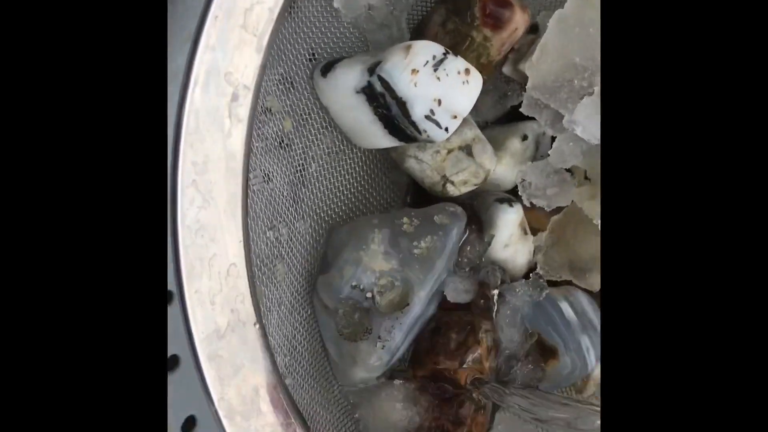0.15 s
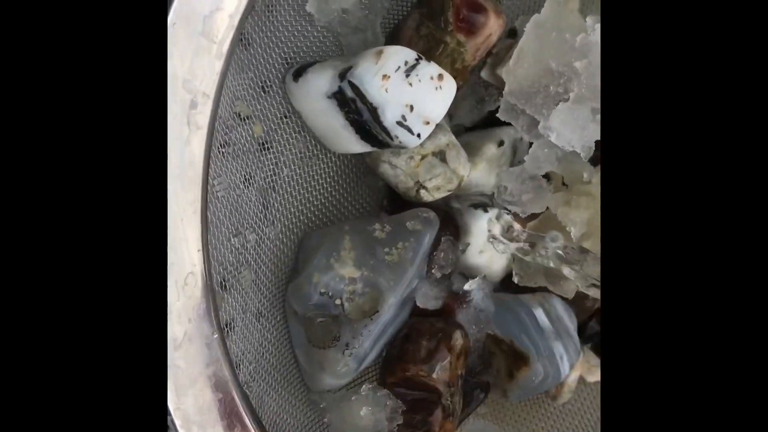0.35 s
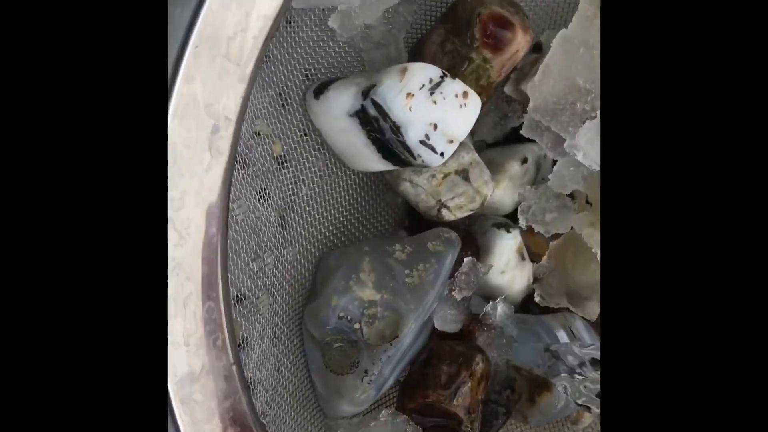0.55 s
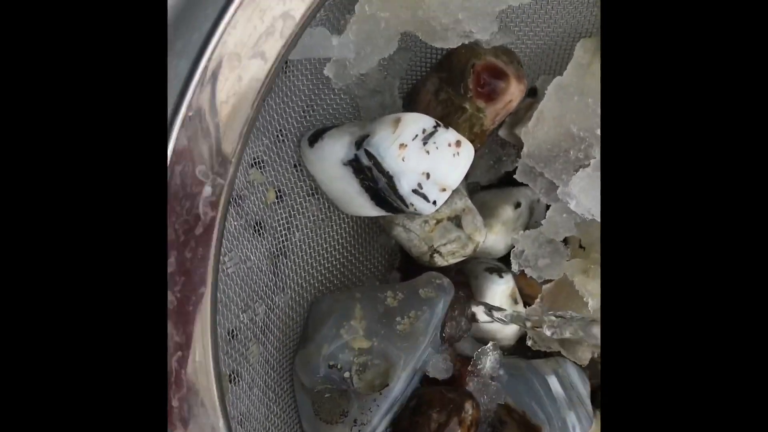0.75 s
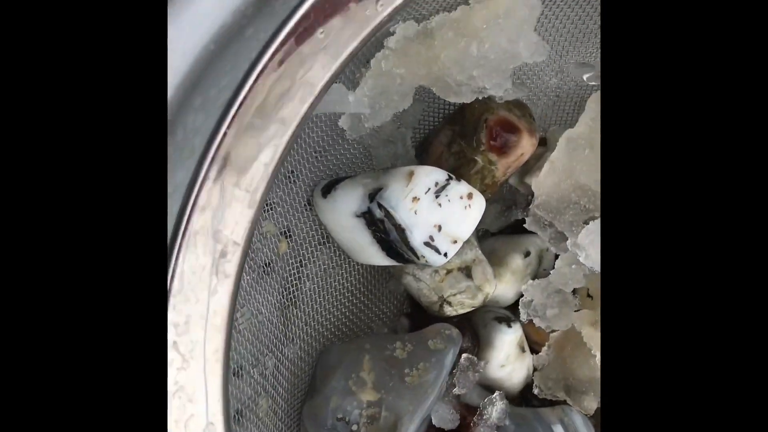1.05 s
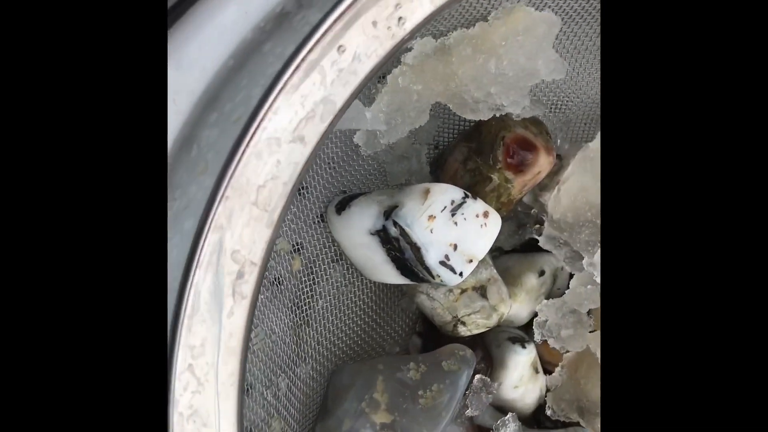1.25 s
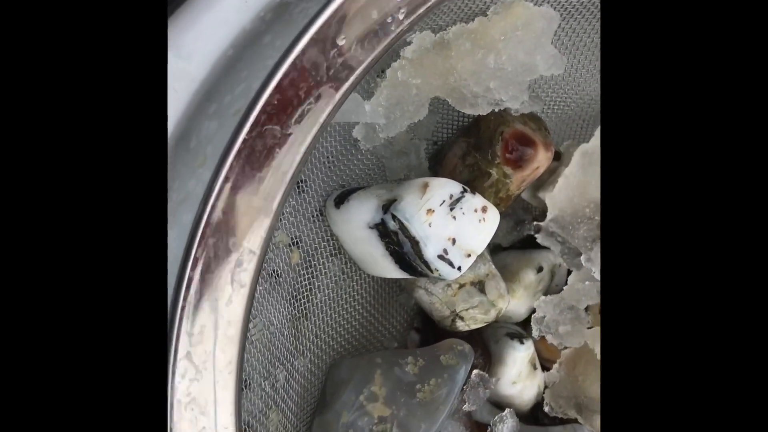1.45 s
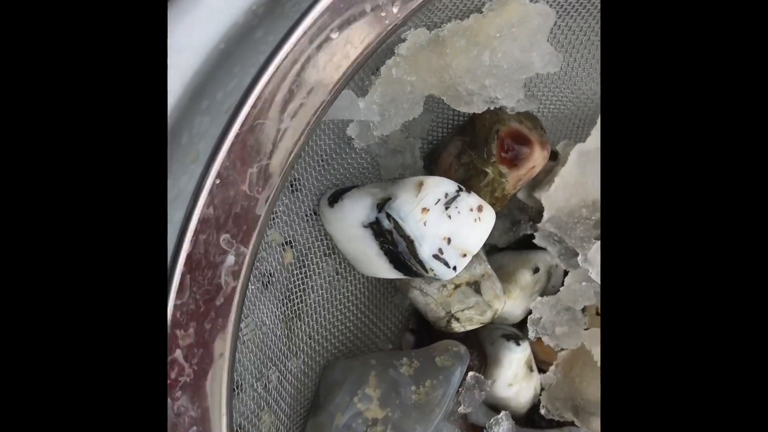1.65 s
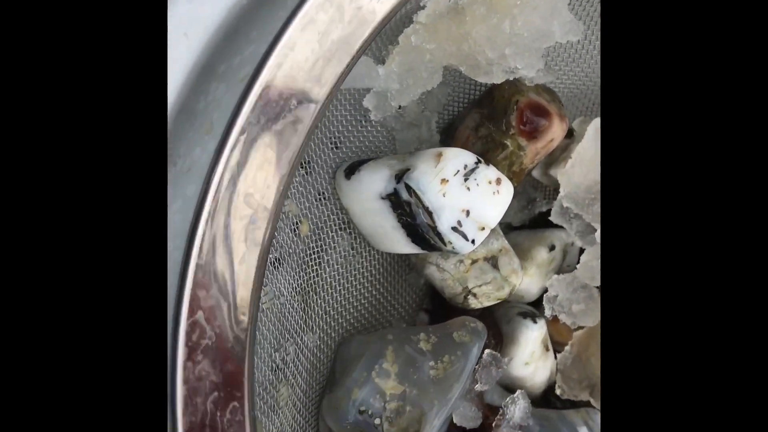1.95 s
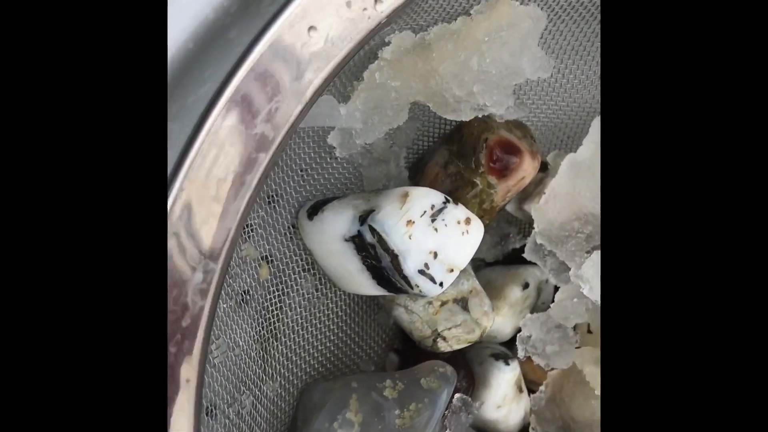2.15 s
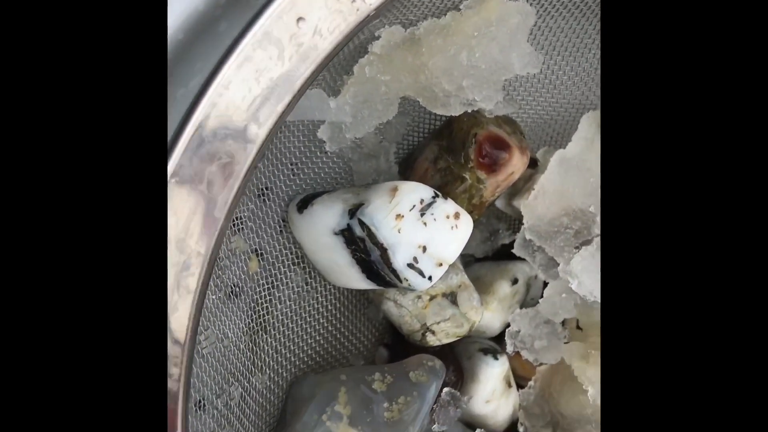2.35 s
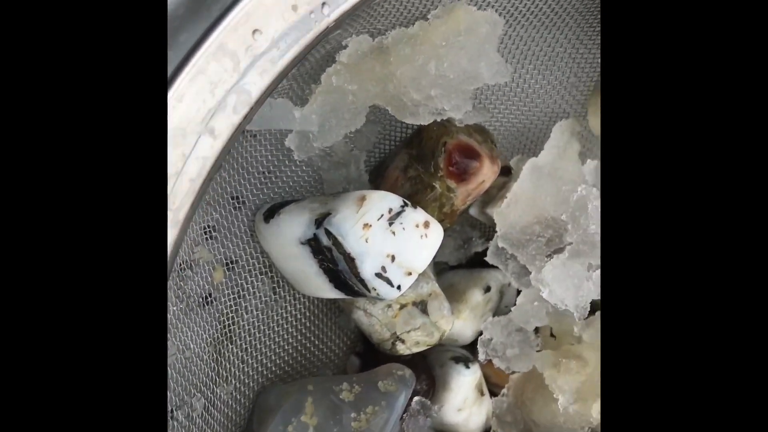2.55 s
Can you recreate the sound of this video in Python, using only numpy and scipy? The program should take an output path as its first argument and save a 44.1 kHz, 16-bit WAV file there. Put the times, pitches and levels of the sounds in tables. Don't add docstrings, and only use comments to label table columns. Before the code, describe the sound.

Water trickles over wet stones in a mesh strainer, crisp splats and small bubbly plops crowding the first half second, then thinning to separate drips and near quiet; close handheld microphone with faint low handling rumble.

```python
import sys
import numpy as np
from scipy import signal
from scipy.fft import rfft, irfft
from scipy.io import wavfile
from scipy.ndimage import uniform_filter1d

SR = 44100
rng = np.random.default_rng(int(sys.argv[2]) if len(sys.argv) > 2 else 0)


def gain_from_db(level_db):
    decades = np.asarray(level_db, float) / 20
    return 10 ** decades


def transcribe(signal):
    frames = np.atleast_2d(signal).T
    limited = np.clip(frames, -1, 1)
    pcm = np.round(limited * 32767).astype(np.int16)
    wavfile.write(sys.argv[1], SR, pcm)


N = 119070

# frequency_hz, density_db (per Hz)
HUM_SPECTRUM = [(30, -9), (72, -4), (313, -7), (510, -15), (1700, -17.5), (2800, -27.5), (9000, -35.5),
                (15900, -31.5)]
# frequency_hz, density_db (per Hz)
RUMBLE_SPECTRUM = [(30, -17.5), (55, 4), (110, -2.5), (200, -8), (350, -10.5), (600, -33.5), (1500, -89.5)]
# middle_s, half_length_s, level_db
HAND_JOLTS = [
    (0.309, 0.0175, -47),
    (0.795, 0.0277, -39.5),
    (0.861, 0.0513, -39),
    (1.041, 0.038, -48),
    (1.218, 0.0635, -50.5),
    (1.346, 0.0139, -33),
    (1.411, 0.0126, -36.5),
    (1.458, 0.0147, -36.5),
    (1.884, 0.126, -54),
    (2.12, 0.018, -53),
]
# time_s, level_db
FLOW_STRENGTH = [(0, -47), (.08, -58), (.2, -57.5), (.33, -43), (.44, -54), (.6, -61.5), (.8, -58),
                 (.92, -60), (.96, -49.5), (1.07, -55.5), (1.4, -66.5), (1.47, -59.5), (1.52, -44),
                 (1.6, -61.5), (1.76, -64.5), (1.83, -54.5), (1.95, -64), (2.7, -66)]
# frequency_hz, gain_db
SPRAY_COLOUR = [(500, 21.5), (1700, 12), (2600, 5.5), (4200, 8.5), (6300, 2), (10300, -1.5), (14000, 4.5),
                (16200, -6)]
# start_s, peak_db, pitch_hz, t60_s
GLUG_EVENTS = [(0.038, -34.5, 1837, 0.0169), (0.126, -23.5, 1867, 0.0222), (0.215, -40, 1679, 0.0546),
               (0.326, -37, 1556, 0.0326), (0.341, -33, 1653, 0.0865), (0.408, -24.5, 1462, 0.0254),
               (0.632, -41, 1235, 0.041), (0.653, -35.5, 1410, 0.0079), (0.694, -39, 2105, 0.0216),
               (0.856, -41.5, 2050, 0.014), (0.877, -30.5, 2056, 0.034), (1.037, -36, 1406, 0.0208),
               (1.349, -37.5, 883.8, 0.0454), (1.524, -30.5, 2094, 0.0123), (1.56, -39.5, 1295, 0.055),
               (1.619, -34.5, 2055, 0.0123), (1.722, -35, 1478, 0.0174), (0.0094, -42.5, 1975, 0.027),
               (0.2399, -34, 1684, 0.0447), (0.374, -32.5, 2138, 0.0263)]
# start_s, peak_db, pitch_hz
BEAD_EVENTS = [(0.023, -57.5, 4350), (0.055, -40, 3805), (.128, -28, 1205), (.129, -39, 661.6),
               (.409, -41, 459.6), (.422, -36.5, 695), (.525, -44, 551), (.877, -31, 3360),
               (0.154, -39.5, 1990), (.533, -33, 5620), (.593, -39, 4320), (.624, -40.5, 1830),
               (0.721, -40, 1968), (.795, -44, 2470), (0.882, -35, 1350), (1.455, -44.5, 4534),
               (1.466, -45.5, 2970), (1.516, -35, 2193), (1.726, -39.5, 2350)]
# start_s, peak_db, pitch_hz
DROPLET_EVENTS = [(0.278, -23.5, 15040), (0.2776, -26.5, 5770), (0.3244, -25.5, 9110), (0.3302, -22, 12440),
                  (0.3313, -33, 4460), (0.3408, -27.5, 7751), (0.3465, -26.5, 5970), (0.3525, -27, 4392),
                  (0.3748, -31, 4410), (0.421, -25, 7190), (0.481, -33.5, 4254), (0.4819, -38.5, 15500),
                  (0.6531, -34.5, 8710), (0.8206, -47.5, 6400), (0.8378, -20.5, 6487),
                  (0.8375, -15.5, 15530), (0.8494, -32, 4360), (0.856, -32, 3975), (0.9425, -28, 9230),
                  (0.959, -36, 15100), (0.974, -40.5, 5800), (0.9807, -36.5, 7493), (0.9898, -34, 15100),
                  (0.9992, -26.5, 15250), (0.9997, -33.5, 4080), (1.0233, -35.5, 15100),
                  (1.0262, -32.5, 5440), (1.0444, -30.5, 14970), (1.1157, -39.5, 15530),
                  (1.1217, -40, 15250), (1.2045, -31, 14800), (1.2098, -40, 4460), (1.3732, -35, 14980),
                  (1.4902, -39, 14814), (1.491, -35.5, 3105), (1.503, -18.5, 13140), (1.5155, -27, 14100),
                  (1.5224, -28, 14100), (1.537, -36, 5760), (1.5431, -30, 15400), (1.5608, -33, 9080),
                  (1.5813, -37.5, 3550), (1.6173, -31.5, 14900), (1.7425, -37.5, 14350),
                  (1.7724, -42, 14039), (1.7849, -41.5, 15417), (1.7853, -39, 4430), (1.797, -30.5, 9750),
                  (1.8009, -41, 4410), (1.8115, -34.5, 15000), (1.8232, -29.5, 11680), (1.849, -31, 14760),
                  (1.879, -33.5, 8785), (1.8829, -36.5, 6360), (1.992, -42.5, 4909), (2.0896, -42, 5566),
                  (2.0987, -42.5, 3194), (2.291, -47.5, 7180), (2.3639, -29, 11800), (2.594, -43, 9850)]
# start_s, peak_db, brightest_hz, t60_s
SPLAT_EVENTS = [(0.038, -23.5, 4900, 0.0116), (0.116, -25.5, 6820, 0.045), (0.1256, -19, 6500, 0.0103),
                (0.1497, -28, 5250, 0.04), (0.17, -27.5, 4620, 0.015), (0.1851, -20.5, 9450, 0.0237),
                (0.2118, -32, 5500, 0.0085), (0.2371, -18, 13600, 0.0185), (0.278, -16.5, 5840, 0.009),
                (0.3005, -16.5, 11600, 0.0148), (0.3738, -19, 5600, 0.0098), (0.3902, -27.5, 4930, 0.0108),
                (0.4064, -17, 5000, 0.0074), (0.42, -14.5, 13800, 0.021), (0.452, -21.5, 5540, 0.0108),
                (0.461, -23, 14200, 0.0069), (0.464, -18, 7700, 0.0146), (0.5632, -22.5, 5750, 0.0095),
                (0.8372, -18, 6660, 0.0176), (0.849, -29, 15600, 0.0122), (0.907, -27, 9900, 0.0108),
                (0.939, -40.5, 6210, 0.0072), (0.9998, -22, 15400, 0.0117), (1.037, -20.5, 4260, 0.0079)]
# start_s, peak_db, brightest_hz, t60_s
LAST_DROPS = [(1.184, -29.5, 4100, 0.0081), (1.3065, -24.5, 13600, 0.0137), (1.3708, -22.5, 14700, 0.0286),
              (1.503, -25, 13100, 0.0093), (1.524, -31.5, 2400, 0.064), (1.5618, -24.5, 3270, 0.0565),
              (1.615, -32.5, 13000, 0.0073), (1.7215, -29, 2590, 0.0215), (1.7973, -33.5, 9800, 0.007),
              (1.8214, -37, 11800, 0.028), (1.8424, -33.5, 14600, 0.025), (1.8998, -34.5, 12400, 0.01),
              (1.9586, -33.5, 5430, 0.012), (2.0954, -28.5, 9180, 0.022), (2.363, -31.5, 11800, 0.0156),
              (2.593, -39.5, 9670, 0.012)]
# start_s, peak_db, pitch_hz, t60_s
PING_EVENTS = [(0.1096, -41.5, 6500, 0.013), (0.2129, -35.5, 3698, 0.03), (0.2258, -16.5, 5547, 0.009),
               (0.281, -25, 3566, 0.0253), (0.3678, -25, 4240, 0.021), (0.392, -18.5, 3885, 0.0204),
               (0.4084, -27.5, 4630, 0.0066), (0.4224, -22.5, 3130, 0.0173), (0.4877, -22.5, 8386, 0.00356),
               (0.5193, -38, 4230, 0.0084), (0.542, -35.5, 3934, 0.0217), (0.5633, -37.5, 3756, 0.011),
               (0.6524, -35.5, 4297, 0.0129), (0.724, -38.5, 6910, 0.0098), (0.7558, -37.5, 4876, 0.0071),
               (0.8133, -36.5, 3596, 0.019), (0.8857, -30, 6380, 0.0087), (0.9459, -26, 6055, 0.0072),
               (1.0643, -44, 2887, 0.033), (1.1018, -40, 6224, 0.0121), (1.2316, -36, 6110, 0.007),
               (1.297, -34.5, 6183, 0.0094), (1.5026, -29, 3020, 0.0093), (1.618, -24.5, 6994, 0.0081),
               (1.6626, -42.5, 4850, 0.0135), (1.8495, -36.5, 5090, 0.0061), (1.8796, -39, 4484, 0.01)]
# start_s, peak_db, pitch_hz, t60_s
PLOP_EVENTS = [
    (0.203, -38, 1235, 0.0195),
    (0.254, -26.5, 1160, 0.0319),
    (0.353, -23, 1984, 0.01),
    (0.384, -28.5, 1373, 0.0183),
    (0.428, -25.5, 1328, 0.0168),
    (0.533, -40.5, 1440, 0.0163),
    (0.872, -24.5, 1724, 0.033),
    (1.308, -41, 672, 0.0151),
    (1.676, -30.5, 968, 0.007),
    (2.144, -28, 954, 0.0043),
]
# start_s, length_s, pitch_hz, level_db
WHISTLE_EVENTS = [
    (2.109, 0.131, 3595, -65.5),
    (2.37, 0.146, 3621, -62.5),
]


def evened(x):
    return x / np.sqrt(np.mean(x ** 2) + 1e-20)


def curve(points):
    return np.interp(np.arange(N) / SR, *np.transpose(points))


def coloured(x, points):
    f, db = np.transpose(points)
    hz = np.fft.rfftfreq(len(x), 1 / SR)
    gain = gain_from_db(np.interp(np.log(hz + 1), np.log(f + 1), db))
    return irfft(rfft(x) * gain, len(x))


def add(mix, start_s, sound):
    part = mix[max(round(start_s * SR), 0):][:len(sound)]
    part += sound[:len(part)]


def smoothed_noise(count, width):
    noise = rng.standard_normal(count)
    return uniform_filter1d(uniform_filter1d(noise, width), width)


def struck(rise_s, t60_s):
    t = np.arange(2600) / SR
    shape = (1 - np.exp(-t / rise_s)) ** 2 * gain_from_db(-60 * t / max(t60_s, 0.002))
    return t, shape / shape.max()


def bubble(hz, t60_s, rise_s, glide, wobble, chance):
    t, shape = struck(rise_s, t60_s)
    tremble = 0.09 * evened(smoothed_noise(len(t), round(2 * SR / hz)))
    turns = hz * t * (1 + glide * t / t60_s) + tremble
    neighbour_turns = turns * (1.2 + 0.2688 * chance[0]) + chance[1]
    return shape * (np.sin(2 * np.pi * turns) + wobble * np.sin(2 * np.pi * neighbour_turns))


def bubbles(rows, rise_s, glide, wobble):
    out = np.zeros(N)
    for (start_s, db, hz, t60_s), chance in zip(rows, rng.random((len(rows), 2))):
        add(out, start_s, gain_from_db(db) * bubble(hz, t60_s, rise_s, glide, wobble, chance))
    return out


def burst(hz, t60_s, rise_s, crack):
    octaves, skirt_db, crack_t60_s = 0.6, -14, 0.003
    t, shape = struck(rise_s, t60_s)
    band = [
        (hz / 2 ** (4 * octaves), 2 * skirt_db),
        (hz / 2 ** (2 * octaves), skirt_db),
        (hz, 0),
        (hz * 2 ** octaves, 0.5 * skirt_db),
    ]
    noise = coloured(rng.standard_normal(len(t)), band)
    spray = evened(coloured(noise, SPRAY_COLOUR))
    return spray * (shape + crack * struck(rise_s, crack_t60_s)[1])


def hum():
    return gain_from_db(-55) * evened(coloured(rng.standard_normal(N), HUM_SPECTRUM))


def rumble():
    t = np.arange(N) / SR
    level = gain_from_db(-54.5) * gain_from_db(3.64 * evened(smoothed_noise(N, 700)))
    for middle_s, half_s, db in HAND_JOLTS:
        level += gain_from_db(db) * np.exp(-((t - middle_s) / half_s) ** 2)
    return level * evened(coloured(rng.standard_normal(N), RUMBLE_SPECTRUM))


def sparse(per_s, spread_db, busy):
    hits = rng.random(N) < per_s * busy / SR
    return hits * gain_from_db(spread_db * np.minimum(rng.exponential(1, N), 2.6))


def drizzle():
    drops_per_s, beads_per_s = 1000, 490
    bead_share, bead_ebb_db_per_s = 0.9, 4
    kinds = 24
    flow = curve(FLOW_STRENGTH)
    busy = np.clip(gain_from_db(0.37 * (flow - flow.max())), 0, 1)
    drops = sparse(drops_per_s, 7.66, busy)
    beads = sparse(beads_per_s, 2.07, busy)
    kind = rng.integers(0, kinds, N)
    fizz, tones = np.zeros(N), np.zeros(N)
    for k, chance in enumerate(rng.random((kinds, 4))):
        place = (k + chance[3]) / kinds
        puff_hz = 2200 * 6.45 ** np.sqrt(place)
        puff = burst(puff_hz, 0.0076 + 0.0169 * chance[2], 0.00055 * chance[0] + 0.000089, 1.0)
        fizz += signal.oaconvolve(drops * (kind == k), puff)[:N]
        hz = 1200 * 5.607 ** place
        tone = bubble(hz, (14 + 30 * chance[2]) / hz, 6.1 / hz, 0.0696, 0.313, chance)
        tones += signal.oaconvolve(beads * (kind == k), tone)[:N]
    ebb = gain_from_db(-bead_ebb_db_per_s * np.arange(N) / SR)
    ringing = bead_share * np.sqrt(busy) * ebb * evened(coloured(tones, SPRAY_COLOUR))
    return gain_from_db(flow) / np.sqrt(busy) * (evened(fizz) + ringing)


def glugs():
    return bubbles(GLUG_EVENTS, rise_s=0.000723, glide=0.0347, wobble=0.222)


def droplets():
    shortest_t60_s, turns = 0.002, 26
    rows = [(s, db, hz, shortest_t60_s + turns / hz) for s, db, hz in DROPLET_EVENTS + BEAD_EVENTS]
    return gain_from_db(-3) * bubbles(rows, rise_s=0.0005, glide=0.0096, wobble=0.267)


def splats():
    out = np.zeros(N)
    for start_s, db, hz, t60_s in SPLAT_EVENTS + LAST_DROPS:
        add(out, start_s, gain_from_db(db - 14.5) * burst(hz, t60_s, rise_s=0.0003, crack=0.73))
    return out


def pings():
    return bubbles(PING_EVENTS, rise_s=0.000296, glide=0.0247, wobble=0.254)


def plops():
    return bubbles(PLOP_EVENTS, rise_s=0.000954, glide=0.056, wobble=0.27)


def basin(x):
    t = np.arange(3000) / SR
    hits = rng.standard_normal(len(t)) * (rng.random(len(t)) < 0.1)
    taps = hits * gain_from_db(-60 * t / 0.0247) * (t > 0.0006)
    return signal.fftconvolve(x, taps / np.linalg.norm(taps))[:N]


def whistles():
    out = np.zeros(N)
    for start_s, length_s, hz, db in WHISTLE_EVENTS:
        t = np.arange(0, length_s, 1 / SR)
        waver = evened(uniform_filter1d(rng.standard_normal(len(t)), size=150))
        swell = np.sin(np.pi * t / length_s)
        add(out, start_s, gain_from_db(db) * swell * waver * np.sin(2 * np.pi * hz * t))
    return out


def scene():
    mist = drizzle()
    drops = glugs() + droplets() + splats() + pings() + plops()
    faint = mist + hum() + whistles() + gain_from_db(-12) * basin(drops + mist)
    faint = signal.oaconvolve(faint, signal.firwin(401, 15900, fs=SR), "same")
    return (drops + faint + rumble())[None]


def top_cut(x):
    return signal.sosfilt(signal.butter(12, 17000, fs=SR, output="sos"), x)


def record(dry):
    edge = signal.firwin(255, 16400, window=("kaiser", 8), fs=SR)
    mix = signal.oaconvolve(dry, edge[None], "same")
    return top_cut(mix)


dry = scene()
out = record(dry)
transcribe(out)
```